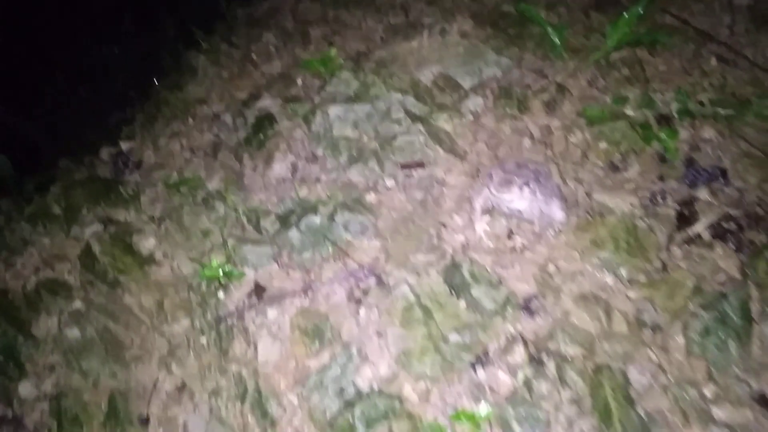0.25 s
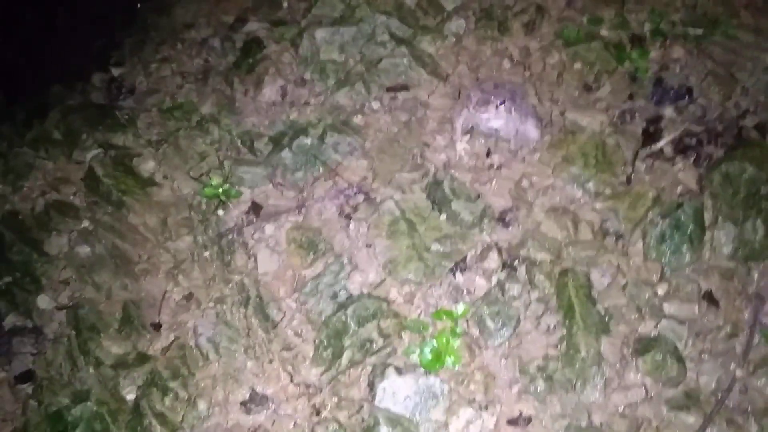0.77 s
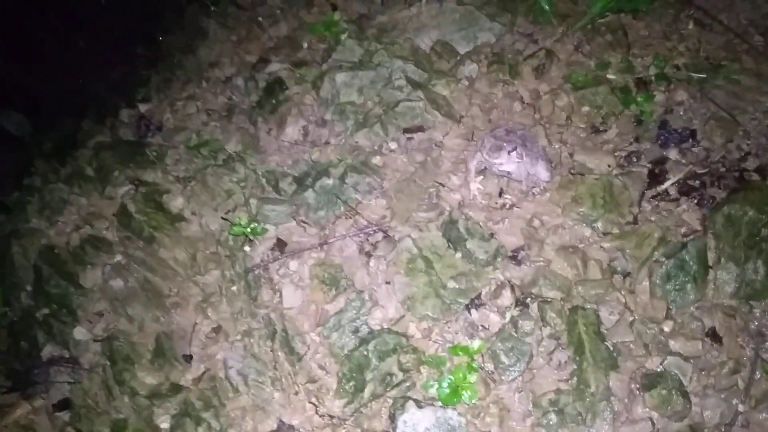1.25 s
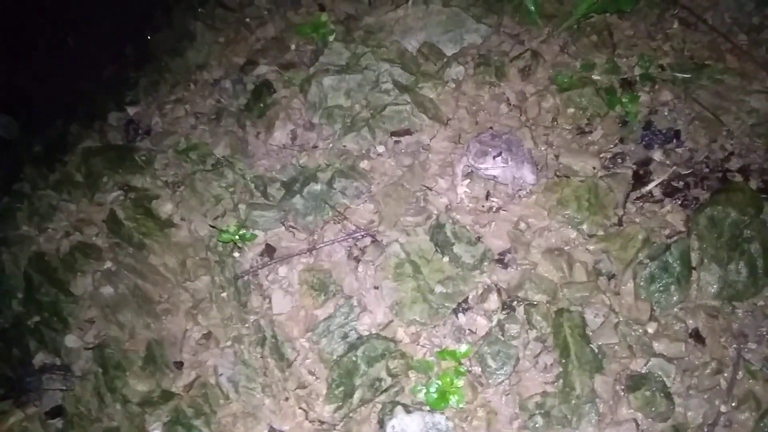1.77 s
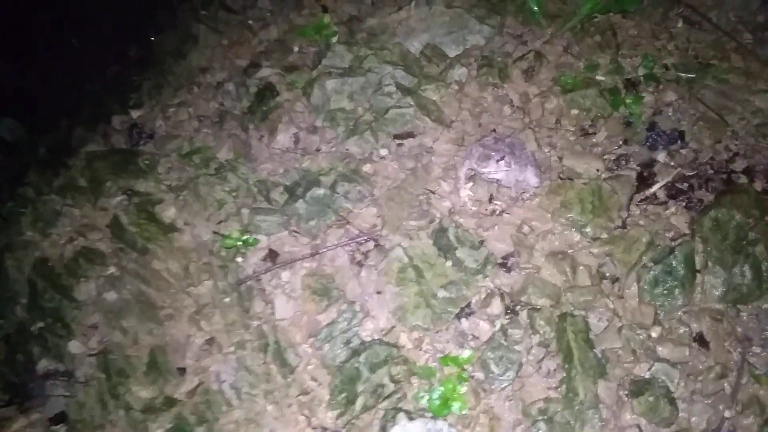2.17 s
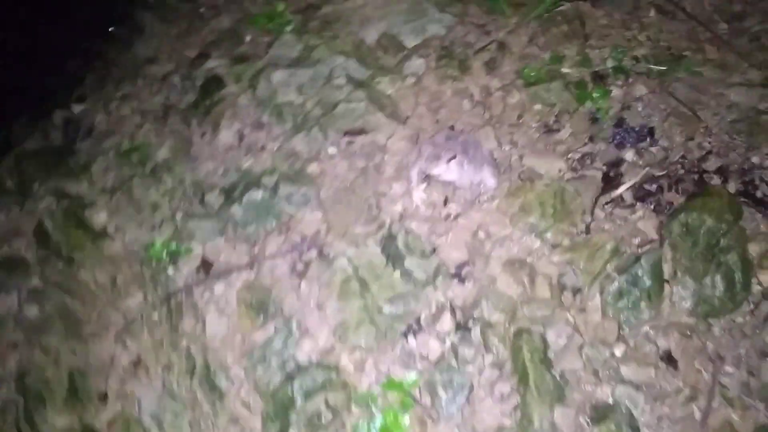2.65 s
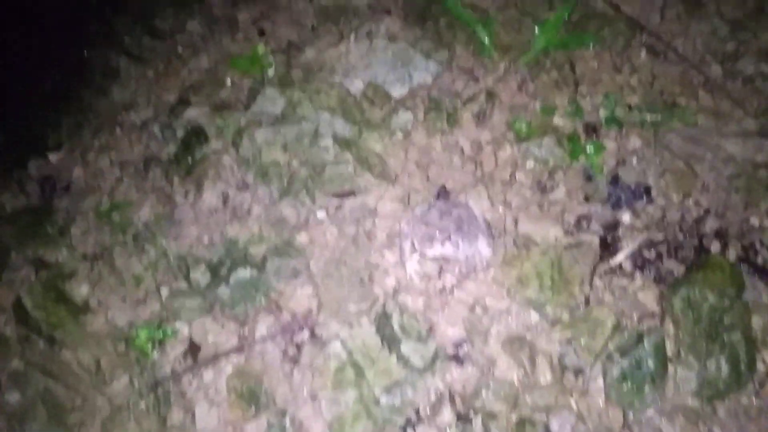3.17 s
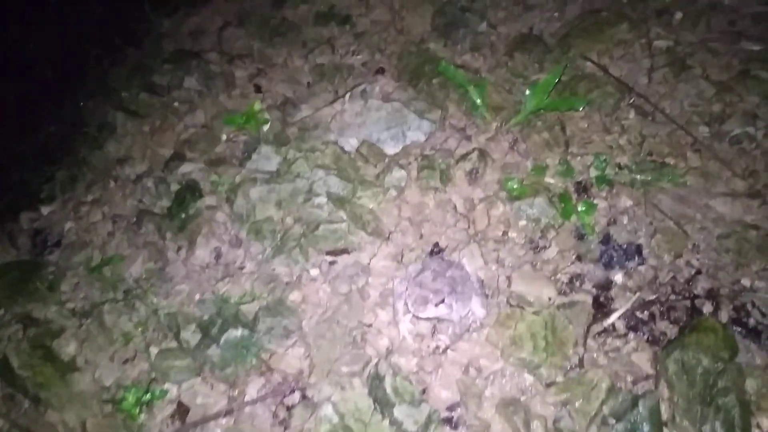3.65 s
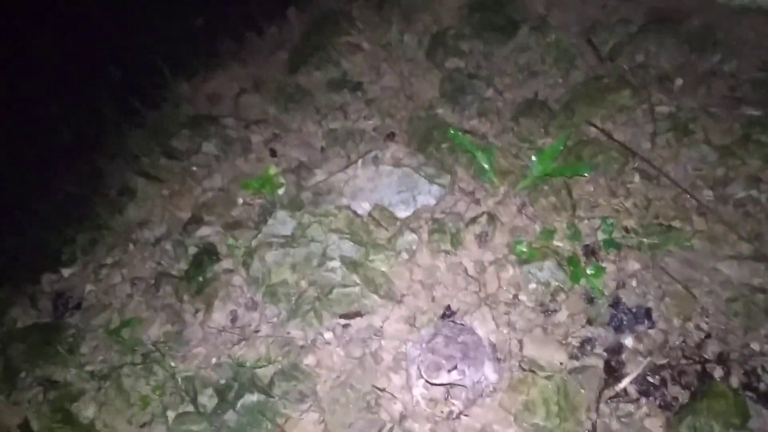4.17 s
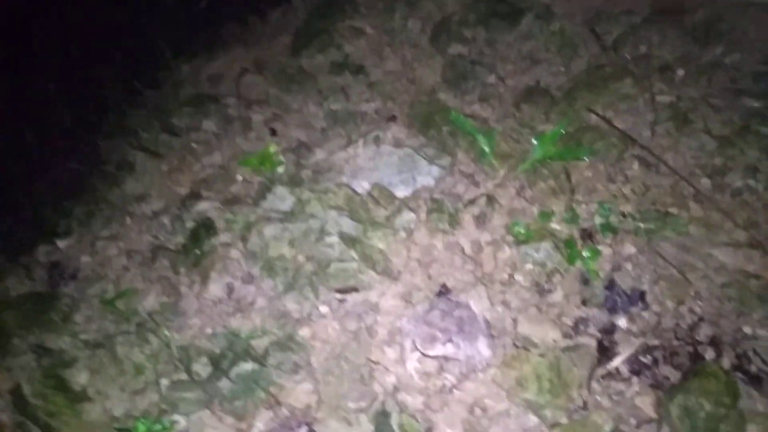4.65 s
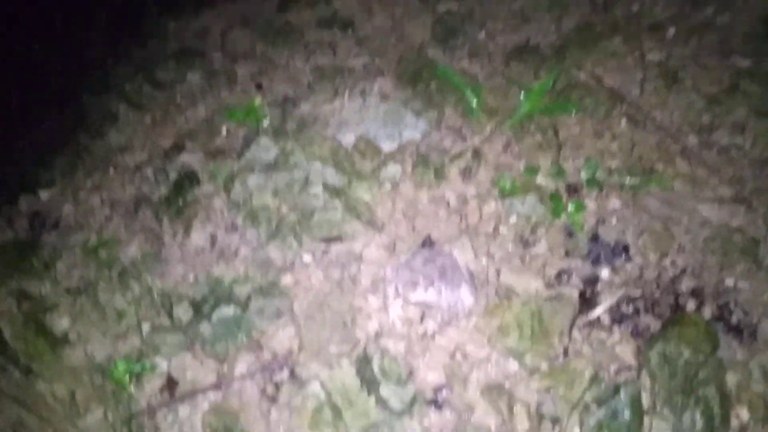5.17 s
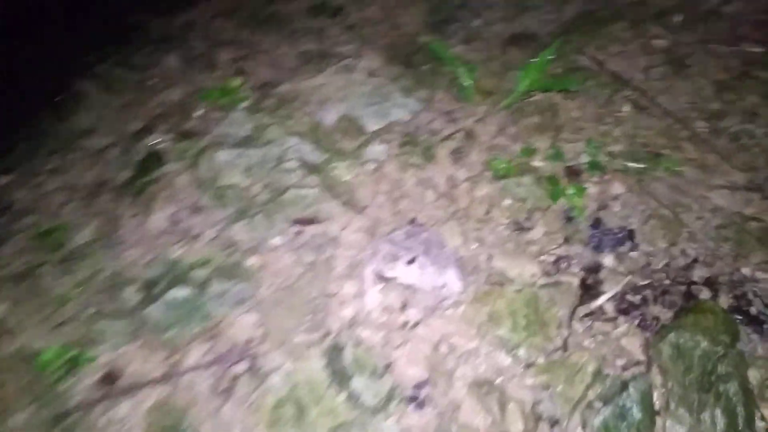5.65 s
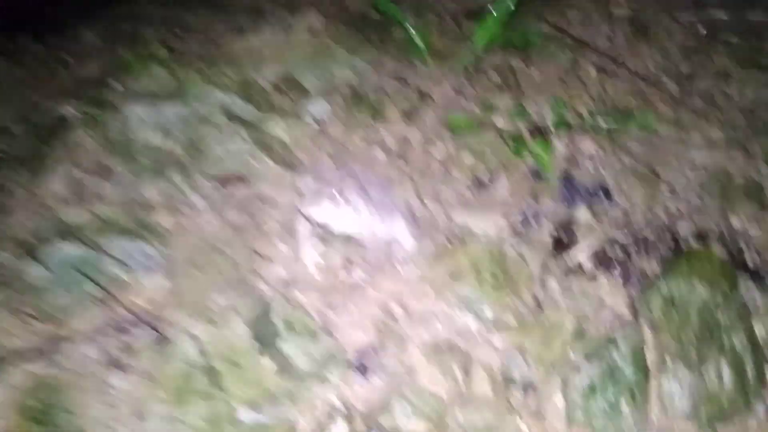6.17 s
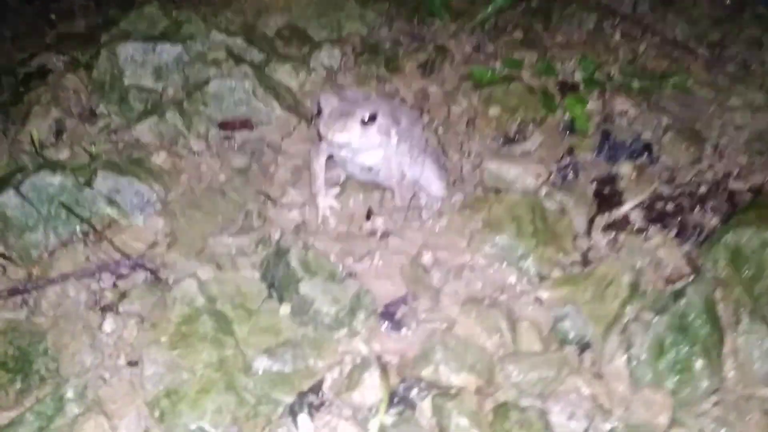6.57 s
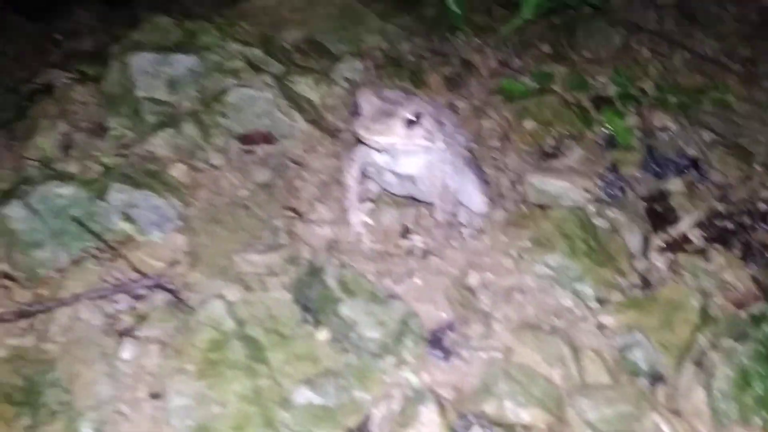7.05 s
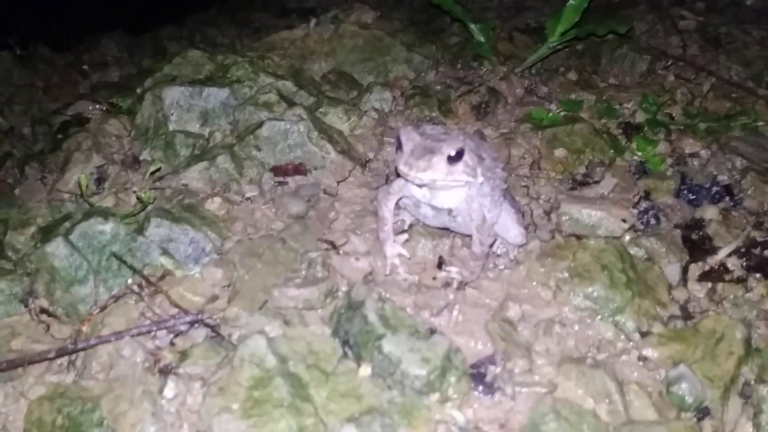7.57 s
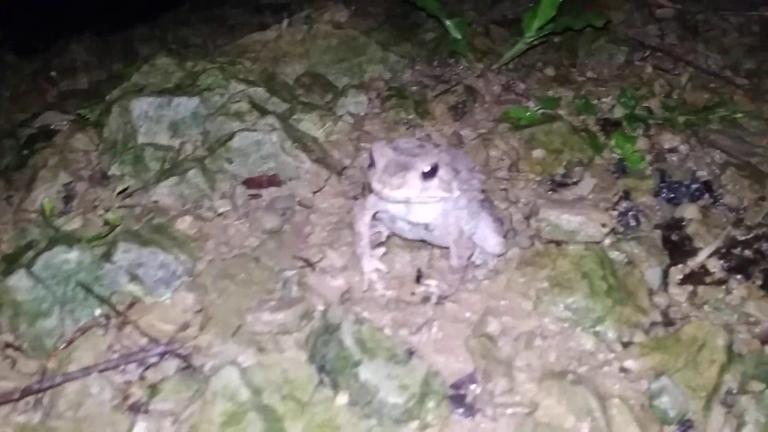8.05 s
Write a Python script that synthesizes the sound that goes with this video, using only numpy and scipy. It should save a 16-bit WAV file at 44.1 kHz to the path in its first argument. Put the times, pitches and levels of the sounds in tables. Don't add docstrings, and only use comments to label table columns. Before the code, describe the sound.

Outdoors at night, a near katydid repeats fast, buzzy high chirps about five a second over a dense, throbbing chorus of far katydids and trilling crickets. Close to the microphone, grit ticks, pebbles knock and dry leaves crunch irregularly. A few low bumps hit the microphone near six seconds, when the insects drop quieter for a while. Faint leaf rustle and low rumble lie beneath.

```python
import sys
import numpy as np
from scipy import signal
from scipy.fft import rfft, irfft, next_fast_len
from scipy.io import wavfile
from scipy.ndimage import uniform_filter1d, map_coordinates

SR = 44100
rng = np.random.default_rng(int(sys.argv[2]) if len(sys.argv) > 2 else 0)


def master(y):
    cut = np.clip(np.atleast_2d(y).T, -1, 1)
    pcm = np.round(cut * 32767)
    wavfile.write(sys.argv[1], SR, pcm.astype(np.int16))


def boost_factor(decibels):
    exponent = np.asarray(decibels, float) / 20
    return 10 ** exponent


N = 366471
TIME = np.arange(N) / SR


def unit(x):
    return x / np.sqrt(np.mean(x ** 2) + 1e-20)


def curves(rows):
    s, *cols = np.transpose(rows)
    return [np.interp(TIME, s, c) for c in cols]


def wobble(rate):
    coarse = TIME[::32]
    knots = rng.standard_normal(int(N * rate / SR) + 4)
    return np.interp(TIME, coarse, map_coordinates(knots, [coarse * rate]))


def tone(hz):
    return np.sin(2 * np.pi * np.cumsum(hz) / SR)


def coloured(x, points):
    m = next_fast_len(len(x) + 8192)
    f, v = np.transpose(points)
    log_hz = np.log(np.fft.rfftfreq(m, 1 / SR) + 1)
    gain = boost_factor(np.interp(log_hz, np.log(f), v, -120, -120))
    return unit(irfft(rfft(x, m) * gain, m)[:len(x)])


def resonant(x, hz, width_hz):
    b, a = signal.iirpeak(hz, hz / width_hz, SR)
    return unit(signal.lfilter(b, a, signal.lfilter(b, a, x)))


def grains(rate, scatter_db):
    hit, size, sign = rng.random((3, N))
    return (hit < rate / SR) * boost_factor(-scatter_db * np.log(size + 0.065)) * np.sign(sign - .5)


def scattered(x, t60, wet_db):
    t = np.arange(SR // 5) / SR
    tail = rng.standard_normal(len(t)) * boost_factor(-60 * t / t60)
    return x + boost_factor(wet_db) * signal.fftconvolve(x, tail / np.linalg.norm(tail))[:len(x)]


def add(out, s, x):
    i = round(s * SR)
    x = x[max(-i, 0):len(out) - i]
    out[max(i, 0):][:len(x)] += x


def air():
    # (time [s], level [dB])
    breeze = [(0, -55), (.25, -52), (.6, -53), (1.32, -53.5), (1.8, -54.5), (2.08, -53), (3.45, -53.5),
              (4.86, -54), (5.51, -52.5), (5.65, -53), (5.72, -55), (6.05, -57.5), (6.3, -56), (6.66, -58),
              (6.92, -56), (7.34, -56), (7.73, -57), (8.31, -54.5)]
    # (frequency [Hz], density [dB per Hz])
    rustle_spectrum = [(120, -20), (250, -14.5), (550, -9.5), (1000, -8), (2000, -2), (3000, -3),
                       (4100, -4), (4300, -10.5), (4550, -7), (5300, -9), (6200, -3.5), (8000, -20),
                       (10000, -52)]
    # (frequency [Hz], density [dB per Hz])
    fizz_spectrum = [(4000, -42), (5500, -8), (8500, 3), (11000, 4), (12200, 2), (14000, -0.5), (15800, -5),
                     (16500, -12)]
    # (frequency [Hz], density [dB per Hz])
    rumble_spectrum = [(8, 8), (14, 7), (25, -0.5), (45, -5.5), (60, -9), (120, -13), (165, -15),
                       (210, -15), (500, -21), (1000, -23), (2000, -30.5)]
    # (frequency [Hz], level [dB])
    engine_orders = [(36.5, -56.5), (70, -69), (108, -74.5)]
    rustle_db, = curves(breeze)
    fizz_db = -60.3 + .65 * (rustle_db - rustle_db.mean())
    crackle = unit(scattered(grains(120, scatter_db=6.0), t60=0.0096, wet_db=1))
    flutter = boost_factor(0.58 * wobble(18) + 1.47 * wobble(45))
    rustle = coloured(flutter * rng.standard_normal(N) + 0.32 * crackle, rustle_spectrum)
    fizz = coloured(flutter * rng.standard_normal(N) + 0.28 * crackle, fizz_spectrum)
    rumble = boost_factor(-51) * coloured(rng.standard_normal(N), rumble_spectrum)
    engine = np.zeros(N)
    for hz, db in engine_orders:
        engine += boost_factor(db + 4.0 + 2.1 * wobble(2.7)) * tone(hz * (1 + 0.0296 * wobble(4)))
    return boost_factor(rustle_db + 3.0) * rustle + boost_factor(fizz_db + 6.5) * fizz + rumble + engine


def katydids(teeth, hz, width_hz, throbs):
    turns = rng.random() + np.cumsum(throbs + 0.73 * wobble(1.6)) / SR
    throb = 1 + 0.28 * np.sin(2 * np.pi * turns)
    swell = boost_factor(.8 * wobble(2.47) + 0.72 * wobble(12))
    own_teeth = np.roll(teeth, rng.integers(N))
    return swell * resonant(own_teeth * throb, hz, width_hz)


def cricket(hz, strokes, waver):
    turn = np.cumsum(strokes * (1 + 0.0586 * wobble(6))) / SR % 1
    drift = .003 * wobble(4) + waver * wobble(50)
    stroke = np.sin(np.pi * np.clip(turn / 0.96, 0, 1))
    return unit(tone(hz * (1.005 - .01 * turn + drift)) * stroke)


def singing(spans):
    return uniform_filter1d(sum((TIME > a) * (TIME < b) * 1. for a, b in spans), size=2000)


def chorus():
    # (time [s], level [dB])
    katydid_swell = [(0, -49), (.46, -48.5), (1.11, -49.5), (1.36, -47), (1.83, -49.5), (2.55, -48),
                     (3.52, -47), (4.07, -49), (4.42, -47), (4.81, -50.5), (5.3, -48), (5.67, -48.5),
                     (6.02, -54.5), (7.03, -53), (7.34, -52), (7.94, -54.5), (8.31, -53)]
    # (time [s], level [dB])
    cricket_lull = [
        (5.5, 1),
        (5.67, -3),
        (6.02, -4.5),
        (7.03, -2.5),
    ]
    # (frequency [Hz], width [Hz], level [dB], throb rate [1/s])
    groups = [(6570, 400, -5.5, 8.7), (6956, 480, -0.5, 9.6), (7240, 570, -1, 9.1), (7580, 390, -3, 10.2),
              (7940, 540, -4.5, 8.2)]
    # (frequency [Hz], level [dB])
    crowd = [(4660, -5), (4700, 1), (4735, -2), (4815, -1), (4860, -1), (4925, -5), (4990, -2), (5065, -8)]
    # (frequency [Hz], stroke rate [1/s], level [dB])
    soloists = [(3260, 38, -71.5), (3490, 45, -70), (3745, 44, -70.5), (3960, 52, -70), (4055, 60, -68),
                (12250, 70, -69.5)]
    # (from [s], to [s])
    bouts = [
        [(1.33, 1.45), (1.72, 2.2), (5.95, 6.2), (6.25, 6.78), (7.3, 7.4), (7.6, 7.7)],
        [(.3, .42), (.85, 1), (1.47, 1.56), (2.45, 2.56), (2.75, 3), (3.3, 3.45), (3.85, 4), (4.33, 4.62),
         (4.85, 4.95), (5.1, 5.25), (5.57, 5.9), (6.45, 6.6), (7.15, 7.25), (7.54, 7.65)],
        [(.12, .27), (.69, .8), (1.45, 1.66), (1.93, 2.15), (2.53, 2.68), (3.25, 3.42), (3.6, 3.78),
         (4.22, 4.45), (4.85, 5.05), (5.5, 5.58), (6.2, 6.3), (7, 7.18), (7.44, 7.77), (8.2, 8.3)],
        [(.2, .29), (1.68, 1.8), (2.5, 2.6), (3.04, 3.12), (3.5, 3.76), (4.43, 4.58), (5.36, 5.42), (7.42, 7.5),
         (7.82, 7.92), (8.24, 8.4)],
        [(.32, .38), (.64, .77), (1.06, 1.14), (1.33, 1.46), (2, 2.1), (2.84, 2.99), (3.27, 3.43), (3.88, 4.15),
         (5.5, 5.7), (6.28, 6.38), (6.6, 6.75), (7.1, 7.3)],
        [(1.05, 1.4), (2.84, 2.99), (3.28, 3.47)],
    ]
    katydids_db, = curves(katydid_swell)
    lull_db, = curves(cricket_lull)
    crickets_db = -56.5 - 0.32 * (katydids_db - katydids_db.max()) + lull_db - 3.5
    teeth = unit(grains(4000, scatter_db=-4)) + 1.26 * rng.standard_normal(N)
    band, trills, solos = np.zeros((3, N))
    for hz, width_hz, db, throbs in groups:
        band += boost_factor(db) * katydids(teeth, hz, width_hz, throbs)
    for hz, db in crowd:
        level_db = db + 2 * wobble(8) + 1.2 * wobble(1.5)
        trills += boost_factor(level_db) * cricket(hz, rng.uniform(30, 75), waver=.0045)
    for (hz, strokes, db), spans in zip(soloists, bouts):
        solos += boost_factor(db + 2 * wobble(12)) * singing(spans) * cricket(hz, strokes, waver=.0055)
    far_katydids = boost_factor(katydids_db - 2.5) * unit(band)
    far_crickets = boost_factor(crickets_db) * unit(scattered(trills, t60=0.35, wet_db=-4.0))
    return far_katydids + far_crickets + boost_factor(lull_db) * scattered(solos, t60=0.1, wet_db=-2)


def high_katydid(tooth_hz=288):
    # (middle [s], half length [s], level [dB])
    rasps = [
        (1.19, .07, -52),
        (2.69, .06, -50),
        (4.48, .06, -50),
        (6.495, 0.072, -51.5),
        (7.96, 0.056, -49),
    ]
    rate_hz = tooth_hz * (1 + .012 * wobble(25) + .012 * wobble(150))
    teeth = np.diff(np.floor(np.cumsum(rate_hz) / SR), prepend=0)
    clicks = scattered(teeth * boost_factor(3 * wobble(300)), t60=0.04, wet_db=4)
    swell = sum(boost_factor(db) * np.exp(-((TIME - s) / half) ** 2) for s, half, db in rasps)
    return swell * resonant(clicks, 12600, width_hz=2000)


def thumps():
    # (time [s], peak [dB], ring length [0-1], hardness [dB], push 1 or pull -1)
    bumps = [
        (5.406, -40, 0.08, -7, 1),
        (5.588, -32.5, 0.55, -15, -1),
        (5.9244, -21.5, 0.9, -3, 1),
        (5.989, -41.5, 1, -18, 1),
        (5.71, -43.5, 0.65, -12, 1),
        (6.878, -38, 0.25, -12, 1),
    ]
    # (frequency [Hz], level [dB], t60 [s])
    housing = [(96, 1.5, 0.12), (148, 12.5, 0.043), (345, -19, 0.016), (800, 15, 0.0093)]
    out, t = np.zeros(N), np.arange(SR // 5) / SR
    for s, db, ring, hard_db, way in bumps:
        modes = np.zeros(len(t))
        for hz, level_db, t60 in housing:
            mode_db = level_db + hard_db * hz / 800 - 60 * t / (t60 * ring)
            modes += boost_factor(mode_db) * np.cos(2 * np.pi * hz * t)
        add(out, s, np.sign(way) * boost_factor(db - 5.5) * modes * (1 - np.exp(-t / 0.00028)))
    return out


def scuffs():
    # (time [s], length [s], level [dB], frequency [Hz],
    # width [Hz])
    drags = [(1.541, 0.035, -52, 1200, 1500), (1.689, 0.028, -50, 500, 700), (2.658, 0.06, -49, 1400, 1200),
             (3.371, .045, -50, 1400, 1770), (3.504, 0.047, -48.5, 980, 1400), (4.29, 0.011, -58, 600, 500),
             (1.84, .08, -58, 5400, 500), (4.44, .07, -57, 5300, 600), (4.678, .1, -60, 5300, 600),
             (4.89, .09, -57, 5300, 600), (5.1, .12, -57, 5300, 600), (5.342, 0.13, -55, 5260, 600),
             (5.995, 0.033, -48, 2400, 900), (6.11, .04, -55, 13700, 900), (5.314, .04, -56, 11000, 4000),
             (6.423, 0.074, -61, 600, 800), (6.872, 0.091, -51, 324, 600)]
    out = np.zeros(N)
    for s, length, db, hz, width_hz in drags:
        fade = (TIME > s) * np.exp(-np.abs((TIME - s) / length) ** 2)
        near = slice(round(s * SR), round((s + 0.2) * SR))
        grit = np.prod(rng.standard_normal((2, len(TIME[near]))), axis=0)
        out[near] += boost_factor(db) * fade[near] * resonant(grit * np.abs(grit), hz, width_hz)
    return out


def rings():
    # (time [s], level [dB], frequency [Hz])
    pebbles = [(0.211, -33, 1530), (0.211, -31, 2930), (0.238, -38, 1640), (0.2998, -37.5, 2020),
               (0.3188, -30, 6000), (0.319, -36, 1190), (0.319, -40, 2400), (0.4245, -29, 1130),
               (0.5637, -45, 5270), (0.5637, -36, 2930), (0.5682, -42, 730), (0.6854, -42, 780),
               (0.9608, -42, 6330), (1.0192, -38, 2710), (1.1524, -30, 5770), (1.1644, -38, 2410),
               (1.2292, -37, 780), (1.2312, -35, 1640), (1.3075, -36, 2280), (1.308, -29, 5770),
               (1.3868, -43, 1030), (1.6842, -46, 780), (1.7081, -34.5, 2670), (2.0084, -40, 5000),
               (2.1122, -37, 1360), (2.7502, -38, 3750), (3.2795, -39, 5470), (3.2795, -32, 2070),
               (3.3768, -39, 2280), (3.3883, -37.5, 2070), (3.3933, -38, 1210), (3.5155, -46, 650),
               (3.7345, -40, 520), (4.2853, -34, 690), (4.6943, -36, 2330), (4.8619, -39, 5640),
               (5.0066, -30.5, 2280), (5.0864, -40, 5170), (5.0879, -35, 1720), (5.1468, -40, 1380),
               (5.2171, -28.5, 5340), (5.2171, -30, 2150), (5.3134, -43, 5680), (5.5873, -39, 950),
               (5.633, -38, 380), (5.9235, -29.5, 3580), (6.0004, -34, 2670), (6.4683, -42, 690),
               (6.4992, -39, 1590), (6.8474, -35.5, 470), (6.8474, -36, 3840), (6.8484, -30.5, 2330),
               (6.8739, -44, 3100), (6.8739, -31, 390), (6.8774, -34, 1770), (8.179, -42, 1000),
               (8.278, -32, 2460), (8.2835, -40, 3000), (8.2976, -40, 4010), (8.298, -43, 2200)]
    # (time [s], level [dB], frequency [Hz])
    chips = [(0.21, -37, 12750), (0.3188, -34, 11500), (0.5637, -40, 12530), (1.1574, -35, 12320),
             (1.1713, -43, 12360), (1.2237, -31, 12530), (1.2237, -28, 14000), (1.2243, -25, 8500),
             (1.2252, -29, 11200), (1.3075, -29, 15200), (1.308, -31, 10200), (1.308, -28, 11900),
             (1.308, -24, 13010), (1.3215, -38, 11200), (1.3265, -40, 12140), (1.3474, -42, 11330),
             (1.4118, -43, 10940), (2.3322, -31, 10100), (2.3327, -35, 11970), (2.334, -37, 9800),
             (2.4569, -40, 11410), (2.7507, -39, 12920), (3.0506, -31, 6680), (3.1204, -18.5, 9200),
             (3.5434, -38, 13180), (3.5434, -37, 10800), (3.7166, -36, 14040), (3.7175, -36, 9000),
             (3.9186, -42, 14810), (3.9186, -36, 8660), (3.9186, -46, 14210), (3.9186, -36, 13400),
             (3.9191, -37, 7060), (4.2853, -17.5, 8630), (4.3351, -41, 11800), (4.4339, -34, 11890),
             (4.4549, -41, 10340), (5.064, -40, 11580), (5.0805, -17.5, 7550), (5.0805, -34, 11580),
             (5.0805, -32, 15120), (5.081, -33, 12140), (5.1967, -40, 14040), (5.1967, -38, 11930),
             (5.1972, -43, 15120), (5.2171, -32, 11370), (5.2171, -34, 9000), (5.5803, -40, 8610),
             (5.5868, -38, 13390), (5.5868, -40, 14560), (5.5873, -36, 12140), (5.9759, -39, 14860),
             (5.9764, -31, 10810), (6.0098, -38, 15460), (7.4615, -32, 14860), (7.9509, -40, 12530),
             (8.1794, -29, 13650), (8.1794, -25, 15200), (8.1799, -33, 11710)]
    out, t = np.zeros(N), np.arange(SR // 40) / SR
    attack = 1 - np.exp(-t / 0.00017)
    for rows, t60 in (pebbles, 0.013), (chips, 0.0085):
        for s, db, hz in rows:
            add(out, s + .0003, boost_factor(db - 60 * t / t60) * attack * np.sin(2 * np.pi * hz * t))
    return out


def contacts(rows, linger, lag):
    out, t = np.zeros(N), np.arange(SR // 8) / SR
    hz = np.fft.rfftfreq(len(t), 1 / SR)
    lead_s = .003
    for s, db, centre_hz, spread_hz, t60, after_db in rows:
        a, b = rng.standard_normal((2, len(t)))
        snap = a * boost_factor(-60 * (t - lead_s) / max(t60, .002)) * (t > lead_s)
        snap[round(lead_s * SR) + 1] = -7.5
        after = b * boost_factor(-60 * t / linger) * np.clip((t - lead_s) / 0.003, 0, 1)
        burst = snap / np.linalg.norm(snap) + boost_factor(after_db) * after / np.linalg.norm(after)
        band = 0.016 + 1 / (1 + 1j * (hz - centre_hz) / (1.46 * spread_hz)) ** 2
        burst = irfft(rfft(burst) * band, len(t))
        level = boost_factor(db) * np.sqrt(SR / 1000) / np.linalg.norm(burst[:SR // 100])
        add(out, s + lag - lead_s, level * burst)
    return out


def footfall():
    # (time [s], energy of first 10 ms [dB re 1 ms at rms 1], centre [Hz], after-rustle
    # [dB])
    ticks = [(.5631, -30.5, 9650, -9), (1.2222, -24.5, 10800, -1), (1.268, -38, 10700, -20),
             (1.3072, -17, 9300, -9), (1.3073, -19, 14300, -17), (1.4496, -36, 9800, -12),
             (2.3315, -28, 10100, -25), (2.4563, -35, 10360, -8), (3.0492, -27, 9900, -8),
             (3.0499, -35, 15000, -14), (3.12, -11.5, 13240, -19), (3.716, -25, 10800, -8),
             (3.716, -32, 14900, -15), (3.733, -48, 11000, -20), (4.258, -39, 14800, -15),
             (4.285, -27, 9200, -17), (4.2851, -34.5, 13000, -15), (4.8614, -37, 6500, -18),
             (5.0529, -24, 11500, -12), (5.0793, -24, 8700, -6), (5.0798, -33, 14500, -7),
             (5.086, -27, 12500, -15), (5.1958, -28, 9500, -10), (5.2165, -25.5, 10500, -13),
             (5.8546, -41, 12500, -10), (6.009, -21.5, 13200, -28), (7.4609, -20.5, 13350, -11),
             (8.179, -21, 14500, -20), (8.1788, -26, 11500, -17)]
    # (time [s], energy of first 10 ms [dB re 1 ms at rms 1], centre [Hz])
    cracks = [(0.21, -31.5, 11300), (0.3181, -29.5, 10000), (.458, -36, 10500), (0.756, -36, 10100),
              (0.9566, -31, 9800), (1.1503, -27.5, 10500), (1.3862, -33.5, 9200), (2.0832, -33, 9300),
              (2.7493, -32.5, 11400), (2.876, -50, 13000), (3.2789, -32, 6070), (3.5425, -28.5, 10600),
              (3.918, -27, 9600), (4.3335, -34.5, 9500), (4.4326, -33, 12300), (4.455, -40, 6200),
              (5.006, -39, 11000), (5.406, -34, 10900), (5.5865, -31.5, 10400), (5.639, -35, 8700),
              (5.922, -35.5, 9900), (5.9755, -27.5, 11200), (6.608, -43, 11000), (6.848, -41, 13000),
              (7.129, -37.5, 14000), (7.25, -46, 12000), (7.325, -55, 14000), (7.393, -44, 13000),
              (8.083, -43, 9000)]
    # (time [s], energy of first 10 ms [dB re 1 ms at rms 1], centre [Hz], t60 [s])
    knocks = [(0.209, -36, 2420, 0.015), (.371, -39, 2400, .025), (.423, -44, 1210, .02),
              (.563, -32.5, 4400, 0.015), (1.3063, -35, 5200, .015), (1.395, -38, 2570, .012),
              (3.277, -34, 2380, 0.022), (3.69, -38.5, 3400, 0.03), (3.731, -38.5, 2120, .052),
              (3.916, -37.5, 2190, 0.032), (4.284, -36.5, 1884, 0.028), (4.331, -36.5, 2500, 0.057),
              (4.409, -36, 1780, 0.026), (4.693, -47, 2480, .027), (4.86, -40, 3280, .037),
              (5.085, -34.5, 2780, 0.028), (5.145, -41, 2500, 0.034), (5.2156, -28, 2900, 0.012),
              (5.485, -37, 1900, 0.035), (5.586, -29.5, 3670, 0.0066), (5.71, -39.5, 1090, 0.027),
              (5.922, -36, 3500, 0.021), (5.951, -38, 1610, .013), (6.498, -53, 1790, 0.016),
              (7.873, -40, 650, 0.024)]
    # (time [s], energy of first 10 ms [dB re 1 ms at rms 1], centre [Hz], after-rustle [dB])
    crushes = [(0.3176, -31.5, 1800, -5), (1.15, -29.5, 5800, -6), (1.222, -35.5, 3040, -4),
               (1.387, -39, 2400, -1), (1.7, -39.5, 1980, 3), (2.456, -34.5, 2770, -4),
               (2.661, -39, 1770, 3), (3.373, -33, 1770, 9), (3.51, -40, 1800, 17), (5.004, -35, 2690, 1),
               (5.195, -38, 3800, 0), (5.406, -30, 1000, -11), (5.999, -36.5, 2480, 8),
               (6.76, -39.5, 3200, -1), (6.846, -34, 2300, 3), (6.872, -35.5, 1900, 3),
               (7.46, -40.5, 2300, -3), (8.277, -34.5, 2600, -3.5)]

    def grit_hz(hz):
        return 1970 - 0.35 * max(hz - 10800, 0)

    def stone_hz(hz):
        return 190 + 0.35 * hz

    tick_t60, crack_t60, crush_t60 = 0.01, 0.026, 0.017
    crack_after_db, knock_after_db = -1.5, -20
    high = [(s, db, hz, grit_hz(hz), tick_t60, after_db) for s, db, hz, after_db in ticks]
    high += [(s, db, hz, grit_hz(hz), crack_t60, crack_after_db) for s, db, hz in cracks]
    low = [(s, db, hz, stone_hz(hz), t60, knock_after_db) for s, db, hz, t60 in knocks]
    low += [(s, db, hz, stone_hz(hz), crush_t60, after_db) for s, db, hz, after_db in crushes]
    return contacts(high, linger=0.18, lag=.0011) + contacts(low, linger=0.26, lag=0.002001)


def chirps():
    # (first chirp [s], period [s])
    phrases = [
        (-.13, .1945),
        (.662, .196),
        (1.426, .1945),
        (1.815, .1985),
        (3.186, .194),
        (5.51, .194),
        (7.086, .203),
    ]
    # (time [s], level [dB])
    effort_curve = [(0, -48.5), (.5, -43.5), (.75, -45.5), (1.3, -49), (2.3, -45.5), (2.8, -47.5),
                    (3.1, -45), (3.8, -44), (4.2, -48), (4.6, -47), (5.4, -47.5), (5.95, -54), (6.3, -50.5),
                    (6.9, -51), (7.2, -49), (8.15, -48.5), (8.31, -52)]
    chirp_s = .134
    ends = [s for s, _ in phrases[1:]] + [N / SR + chirp_s]
    runs = [np.arange(s, end - period / 2, period) for (s, period), end in zip(phrases, ends)]
    times, levels_db = np.transpose(effort_curve)
    return [(s, chirp_s, np.interp(s + chirp_s / 2, times, levels_db)) for s in np.concatenate(runs)]


def near_katydid(wing_hz=9545, stroke_hz=73):
    # (offset [Hz], level [dB])
    wing_modes = [(0, 0), (75, -7), (150, -8), (-200, -15), (-410, -20)]
    out, t = np.zeros(N), np.arange(SR // 3) / SR - .03
    turn = (t * stroke_hz + .5) % 1 - .5
    for s, length, db in chirps():
        firm, *luck_db = rng.standard_normal(len(wing_modes) + 2)
        weak = np.clip(.55 + .3 * firm, .15, 1.1)
        beats = .14 + np.exp(-(turn / .13) ** 2)
        for at, size in [(.33, .62), (-.33, .38)]:
            beats += size * weak * np.exp(-((turn - at) / .13) ** 2)
        rise = np.clip((t + .025) / .045, 0, 1)
        fall = np.clip((length - t) / .05 + .4, 0, 1)
        swell = rise * fall * boost_factor(-500 * (t - .055) ** 2)
        knots = np.linspace(t[0], t[-1], 40)
        effort, waver = (np.interp(t, knots, rng.standard_normal(40)) for _ in range(2))
        pitch_hz = wing_hz + 20 * waver - 180 * (t - .06) - 120 * turn + 110 * np.exp(-(t + .03) / .03)
        wing = np.zeros(len(t))
        for (offset_hz, mode_db), luck in zip(wing_modes, luck_db):
            wing += boost_factor(mode_db + 2.5 * luck * (offset_hz != 0)) * tone(pitch_hz + offset_hz)
        song = scattered(swell * beats * boost_factor(2.2 * effort) * wing, t60=.22, wet_db=-7.5)
        level = boost_factor(db + 0.55 + .9 * luck_db[-1]) * np.sqrt(length / (t[-1] - t[0]))
        add(out, s - .033, level * unit(song))
    return signal.sosfilt(signal.butter(20, 9755, fs=SR, output="sos"), out)


def scene():
    ground = footfall() + rings() + thumps() + scuffs()
    return np.tile(ground + near_katydid() + high_katydid() + chorus() + air(), (2, 1))


def band_limit(x):
    return signal.sosfilt(signal.butter(12, 16990, fs=SR, output="sos"), x)


def record(dry):
    steady_top_hz, top_hz = 15770, 16900
    hiss = boost_factor(-65.0) * rng.standard_normal(N)
    z, hz = rfft(dry + hiss), np.fft.rfftfreq(N, 1 / SR)
    top = irfft(z * (hz >= steady_top_hz) * np.clip((top_hz - hz) / 900, 0, 1), N)
    loud = np.abs(uniform_filter1d(top ** 2, size=400)) > boost_factor(-52) ** 2
    gate = uniform_filter1d(loud * 1., size=300)
    return band_limit(irfft(z * (hz < steady_top_hz), N) + top * gate)


dry = scene()
out = record(dry)
master(out)
```